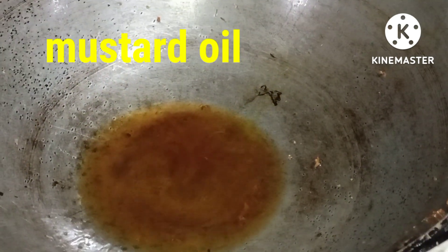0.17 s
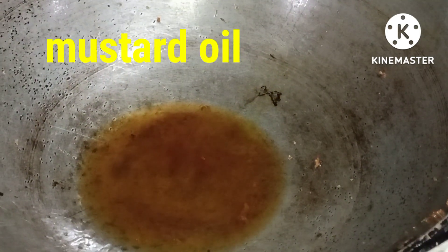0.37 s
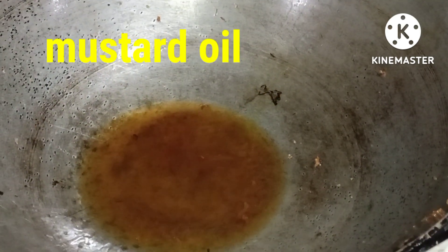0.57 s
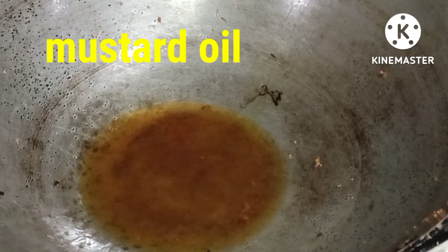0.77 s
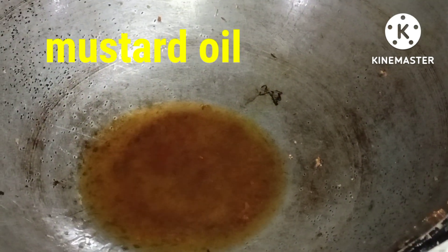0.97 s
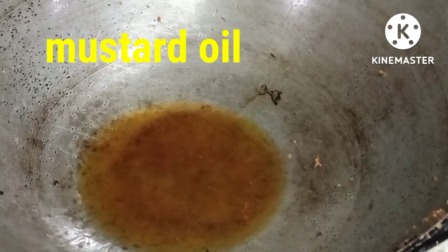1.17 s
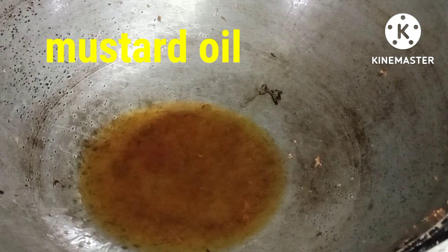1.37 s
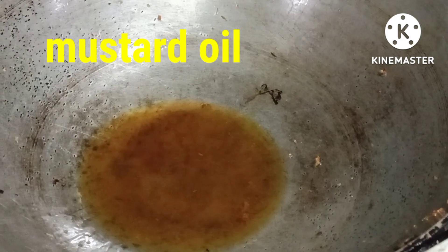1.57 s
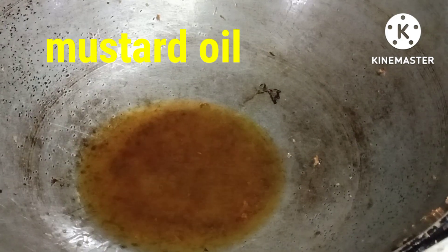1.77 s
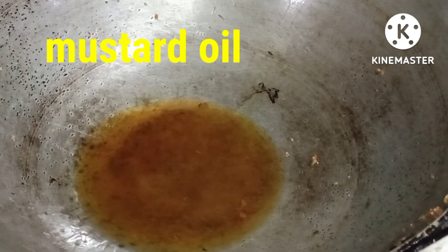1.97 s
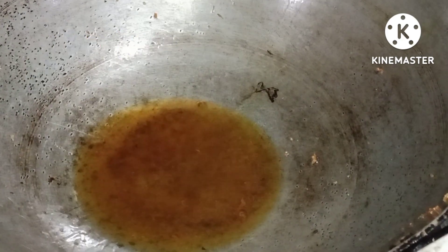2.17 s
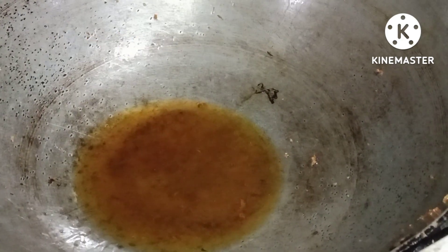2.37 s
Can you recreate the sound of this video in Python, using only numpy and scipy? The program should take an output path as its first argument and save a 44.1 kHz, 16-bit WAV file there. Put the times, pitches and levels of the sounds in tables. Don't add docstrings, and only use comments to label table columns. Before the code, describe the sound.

Hot oil pops and spits in a steel wok, each snap ringing briefly off the metal; a dense cluster comes first, then sparse pops, over faint burner hiss in a small kitchen, close microphone.

```python
import sys
import numpy as np
from scipy import signal
from scipy.io import wavfile
from scipy.ndimage import uniform_filter1d

SR = 44100
rng = np.random.default_rng(int(sys.argv[2]) if len(sys.argv) > 2 else 0)


def transcribe(signal):
    frames = np.atleast_2d(signal).T
    limited = np.clip(frames, -1, 1)
    pcm = np.round(limited * 32767).astype(np.int16)
    wavfile.write(sys.argv[1], SR, pcm)


def gain_from_db(level_db):
    decades = np.asarray(level_db, float) / 20
    return 10 ** decades


N = 105840


def columns(rows):
    return np.array(rows, float).T


def unit(x):
    return x / np.sqrt(np.mean(x ** 2))


def smooth(x, size):
    return uniform_filter1d(uniform_filter1d(x, size), size)


def reso(x, hz, width):
    return signal.lfilter(*signal.iirpeak(min(hz, 0.45 * SR), hz / width, fs=SR), x)


def reso2(x, hz, width):
    return reso(reso(x, hz, width), hz, width)


def hiss(hz, width):
    return unit(reso2(rng.standard_normal(N), hz, width))


def walk(rate):
    hold = int(SR / rate)
    levels = rng.standard_normal(N // hold + 1)
    return 4 / 3 * smooth(np.repeat(levels, hold), hold)[:N]


def add(out, x, s):
    i = int(s * SR)
    out[i:i + len(x)] += x[:max(N - i, 0)]


def ring(modes, t, gains, stretch):
    hz, db, t60 = columns(modes)[:, :, None].astype(np.float32)
    t, gains = t.astype(np.float32), gains.astype(np.float32)
    decay = gain_from_db(db - 60 * t / (t60 * stretch))
    return np.sum(gains[:, None] * decay * np.sin(2 * np.pi * hz * t), axis=0)


def swells(rows, width, roundness):
    out = np.zeros(N)
    for s, length, hz, db in rows:
        n = int(length * SR)
        noise = reso2(rng.standard_normal(SR // 2), hz, width)[-n:]
        add(out, gain_from_db(db) * np.hanning(n) ** roundness * unit(noise), s)
    return out


def glide(rows, wobble, rough_db):
    s, hz, db = columns(rows)
    t = np.arange(N) / SR
    level = np.interp(t, s, db, left=-120, right=-120) + 4.5 + rough_db * walk(50)
    pitch = np.interp(t, s, hz) * (1 + wobble * walk(65))
    return gain_from_db(level) * np.sin(2 * np.pi * np.cumsum(pitch) / SR)


# f/Hz, level/dB, t60/s
WOK_MODES = [(2470, 2, .1), (2885, -4, .17), (2990, -8, .25), (3100, -4, .2), (3385, -3, .12),
             (3445, -3, .1), (3515, -5, .16), (3650, -3, .13), (3715, -6, .1), (4000, -7, .06),
             (4370, -6, .09), (4905, -1, .15), (5140, -6, .15), (5180, -8, .12),
             (5400, -3, .12), (5515, -3, .17), (5650, -8, .18), (5795, -4, .14), (5865, -5, .18),
             (6120, -4, .15), (6420, -9, .1), (6810, -6, .15), (7260, -6, .15), (7500, -9, .12),
             (7790, -10, .12)]
# f/Hz, width/Hz, level/dB
WOK_BANDS = [(358, 550, -29), (1510, 1200, -23), (2616, 540, -3), (3240, 1000, 2.5), (4200, 500, -5.5),
             (5060, 690, 0), (5940, 780, -1.5), (7100, 1500, -3.5), (9760, 990, -13), (11990, 850, -20),
             (13400, 2700, -29), (15000, 1313, -23.5)]


def bursts(rows, sharp, modes_db, skirt_db, tail_db, top_db):
    snap_db, patchy_db, scatter_db = 33, 3.5, 3.0
    wok_modes = WOK_MODES
    out, broad, t = np.zeros(N), np.zeros(N), np.arange(SR // 5) / SR
    for s, db, hz, t60 in rows:
        noise = rng.standard_normal((3, len(t)))
        gains = gain_from_db(scatter_db * rng.standard_normal(len(wok_modes)))
        fade = gain_from_db(-60 * t / t60) + gain_from_db(tail_db - 60 * t / 0.11)
        patchy = gain_from_db(patchy_db * unit(smooth(noise[2], 150)))
        modes = ring(wok_modes, t, gains, t60 / 0.17) * np.sqrt(patchy)
        ping = noise[0] * fade * patchy + gain_from_db(modes_db) * modes
        ping[0] += gain_from_db(snap_db)
        for _ in range(3):
            ping = reso(ping, hz, hz / sharp)
        head = np.sqrt(uniform_filter1d(ping ** 2, size=60)[:900].max())
        add(out, gain_from_db(db - 4) * ping / head, s)
        snap = noise[1] * (fade + gain_from_db(2.5 - 60 * t / 0.026))
        add(broad, gain_from_db(db + skirt_db) * snap, s)
    for hz, width, db in WOK_BANDS:
        band_db = db + top_db * (hz > 9e3)
        out += gain_from_db(band_db) * reso(reso2(broad, hz, width), hz, width)
    return out


# t/s, peak level/dB, bubble f/Hz, ring t60/s
LARGE_BUBBLES = [(0.2358, -21.5, 3760, 0.18), (0.3478, -17, 3840, 0.21), (0.389, -22, 4600, 0.22),
                 (0.4399, -13, 3155, 0.13), (0.5709, -15.5, 3920, 0.14), (0.608, -18.5, 3900, 0.53),
                 (0.62, -18, 3400, 0.18), (0.6705, -7.5, 3070, 0.14), (0.7721, -28, 3450, 0.15),
                 (0.9234, -51.5, 3750, 0.17), (0.932, -46, 3840, 0.17), (1.1543, -30, 4280, 0.25),
                 (1.1628, -17.5, 3450, 0.19), (1.295, -46.5, 3700, 0.12), (1.3241, -40.5, 3550, 0.2),
                 (1.594, -21, 3670, 0.063), (1.6022, -17, 3695, 0.18), (2.0185, -37, 2230, 0.08),
                 (2.1306, -41.5, 3480, 0.14), (2.3039, -37, 4030, 0.19)]


def large_bubbles():
    return bursts(LARGE_BUBBLES, 4.6, modes_db=-7.0, skirt_db=-12, tail_db=-35.0, top_db=-11.5)


# t/s, peak level/dB, bubble f/Hz, ring t60/s
SMALL_BUBBLES = [(0.2368, -32, 5570, 0.097), (0.3082, -14, 5300, 0.23), (0.3264, -21, 6770, 0.27),
                 (0.3427, -43, 5050, 0.14), (0.3475, -21, 5070, 0.052), (0.3902, -22.5, 5680, 0.2),
                 (0.4374, -17.5, 5360, 0.14), (0.4929, -10, 5820, 0.18), (0.5104, -9.5, 5560, 0.067),
                 (0.5708, -22, 5170, 0.088), (0.6084, -24.5, 4920, 0.19), (0.623, -14, 4630, 0.15),
                 (0.671, -7.5, 5940, 0.12), (0.7705, -26, 5030, 0.17), (0.9326, -41, 7150, 0.12),
                 (1.1522, -30, 4285, 0.15), (1.1621, -22.5, 5020, 0.12), (1.28, -53.5, 6970, 0.1),
                 (1.4202, -26.5, 5710, 0.11), (1.5933, -35, 6040, 0.11), (2.1328, -11, 5594, 0.15),
                 (2.2434, -32.5, 7370, 0.25), (2.2507, -33, 6500, 0.12), (2.3027, -33, 5900, 0.092)]


def small_bubbles():
    return bursts(SMALL_BUBBLES, 5.3, modes_db=-10.0, skirt_db=-23.0, tail_db=-17, top_db=5.0)


# t/s, peak level/dB, f/Hz, ring t60/s
CLEAN_PINGS = [(.2358, -34, 7000, 0.16), (.2358, -34.5, 2615, 0.086), (.31, -38.5, 2650, .1),
               (.44, -26.5, 2510, 0.1), (.62, -29, 2480, 0.064), (.672, -25, 2430, 0.2),
               (.672, -40.5, 7100, 0.27), (1.4202, -41, 7000, 0.11), (1.594, -28.5, 4610, 0.16),
               (1.6022, -23.5, 4786, 0.13), (1.594, -33, 7380, 0.19), (1.6022, -39, 2460, 0.23),
               (2.0185, -23, 3238, 0.21), (2.0185, -26.5, 3032, 0.17), (2.0185, -37, 5000, 0.063),
               (2.0185, -31.5, 6260, 0.13), (1.163, -34.5, 2453, 0.14), (1.163, -30.5, 6570, 0.18),
               (.933, -58, 2500, 0.11), (2.133, -29, 7360, 0.15), (2.133, -23.5, 5250, 0.18),
               (2.3035, -50, 2576, 0.24)]


def clean_pings():
    return bursts(CLEAN_PINGS, 8, modes_db=-4.5, skirt_db=-25.5, tail_db=-24.5, top_db=5.5)


# t/s, peak level/dB, f/Hz, ring t60/s
SPITS = [(0.3475, -48, 14200, 0.08), (0.363, -31.5, 15000, 0.1), (0.4394, -36, 9500, 0.35),
         (0.4933, -50, 11500, 0.12), (0.519, -43, 15000, 0.13), (0.584, -36, 9780, 0.43),
         (0.6712, -42, 9800, 0.072), (0.7298, -44, 12000, 0.11), (0.787, -23.5, 16350, 0.15),
         (1.4187, -50.5, 9950, 0.094), (1.695, -62, 12100, 0.062), (2.045, -48.5, 9500, 0.12),
         (2.1324, -43, 10760, 0.079)]


def spits():
    return bursts(SPITS, 10, modes_db=-41, skirt_db=-8, tail_db=-39.5, top_db=-3)


# start t/s, length/s, f/Hz, level/dB
FIZZ = [
    (.3, .27, 12100, -62.5),
    (.43, 0.063, 13040, -50.5),
]


def fizz():
    return swells(FIZZ, 4100, 0.56)


# t/s, peak level/dB
TICKS = [(.09, -65), (.125, -51), (0.419, -43), (.428, -41.5), (.788, -51), (0.2352, -33), (1.163, -60),
         (1.42, -49.5), (1.594, -60.5), (2.135, -43), (2.2447, -28.5), (2.253, -34)]


def ticks():
    out, t = np.zeros(N), np.arange(SR // 8) / SR
    for s, db in TICKS:
        fade = gain_from_db(-60 * t / 0.0027) + gain_from_db(-18.0 - 60 * t / 0.1)
        add(out, gain_from_db(db) * rng.standard_normal(len(t)) * fade, s)
    return signal.sosfilt(signal.butter(4, 5000, "high", fs=SR, output="sos"), out)


# f/Hz, level/dB, t60/s
KNOCK_MODES = [(267, -20, 0.056), (338.4, -21.5, 0.15), (413.2, 6.5, 0.076), (562, -25, 0.053),
               (820.3, 11.5, 0.1)]


def knock():
    knock_s, knock_db, push_s = 0.4295, -18, 0.0069
    t = np.arange(SR // 4) / SR
    body = ring(KNOCK_MODES, t, np.ones(len(KNOCK_MODES)), 0.75)
    rough = unit(reso(reso(rng.standard_normal(len(t)), 260, 420), 210, 680))
    x = body / np.abs(body).max() + gain_from_db(-16.5 - 60 * t / 0.16) * rough
    out = np.zeros(N)
    add(out, gain_from_db(knock_db) * x * (1 - np.exp(-t / push_s)), knock_s)
    return out


# f/Hz, width/Hz, level/dB
BURNER = [
    (8270, 410, -65.5),
    (9220, 19, -75.5),
    (7000, 280, -80.5),
    (9800, 4500, -78),
]


def burner():
    return sum(gain_from_db(db + 2.12 * walk(2)) * hiss(hz, width) for hz, width, db in BURNER)


# start t/s, length/s, f/Hz, level/dB
THUDS = [(.12, 0.11, 62.6, -71.5), (.23, 0.18, 66.3, -60), (.44, 0.21, 63.3, -57.5),
         (.76, 0.11, 60.8, -58.5), (.92, 0.12, 67.6, -67), (1.13, .1, 100.7, -62.5), (1.62, 0.23, 63, -67),
         (1.9, 0.3, 108.3, -55.5), (2.0, 0.12, 213, -64.5), (2.12, 0.19, 67, -61),
         (2.33, 0.087, 82.5, -62.5)]


def thuds():
    return swells(THUDS, 50, 0.7)


# f/Hz, level/dB per Hz
ROOM_TONE = [(18, -35), (30, 10), (111, 7.5), (1130, -7), (1280, -1), (1900, -10), (4520, -15.5),
             (8380, -3.5), (11000, -17.5), (14300, -63), (22000, -120)]


def room_tone():
    f, level = columns(ROOM_TONE)
    room = np.zeros(N)
    for hz in 50 * 2 ** np.arange(0, 7.9, 1 / 3):
        band_db = np.interp(np.log(hz), np.log(f), level) + 10 * np.log10(hz)
        room += gain_from_db(band_db + 2.6 * walk(13.96)) * hiss(hz, hz / 3.8)
    return gain_from_db(-70.5) * unit(room)


def stove_and_room():
    dull = signal.ellip(8, 1, 40, 10580, fs=SR, output="sos")
    floor = signal.sosfilt(dull, burner() + room_tone())
    return floor + thuds() + gain_from_db(-92) * hiss(15200, 900) + gain_from_db(-95) * hiss(13000, 3000)


# start t/s, length/s, f/Hz, level/dB
CHIRPS = [(0.098, 0.01, 760, -78), (0.636, 0.061, 590, -62), (0.69, 0.092, 580, -64.5),
          (1.03, 0.059, 1250, -71), (1.27, 0.073, 1280, -69), (1.41, 0.091, 1660, -70),
          (1.15, .06, 1356, -68.5), (0.203, 0.043, 4000, -64), (2, 0.057, 1400, -76),
          (1.783, 0.066, 1324, -66.5), (1.937, 0.03, 1330, -67.5), (2.039, 0.064, 1408, -60),
          (2.154, 0.066, 1240, -61), (1.85, 0.12, 5700, -71.5), (1.1, 0.11, 6750, -66),
          (1.8, 0.065, 6750, -60), (1.7, 0.12, 4000, -81), (.38, 0.055, 2050, -58),
          (.5, 0.043, 1200, -66.5), (2.32, 0.085, 6600, -64), (0.115, 0.04, 5280, -64.5)]
# t/s, f/Hz, level/dB
WHINE = [(0, 1250, -70.5), (.1, 1282, -70), (.2, 1377, -77), (.28, 1415, -70.5), (.36, 1540, -94)]
# t/s, f/Hz, level/dB
WHISTLE = [(1.722, 3040, -80), (1.736, 3000, -61), (1.756, 2930, -58), (1.78, 2970, -57),
           (1.812, 2930, -68), (1.83, 2950, -75), (1.87, 2950, -90)]
# t/s, f/Hz, level/dB
WAVER = [(.61, 1280, -85), (.645, 1270, -69), (.68, 1200, -64), (.72, 1180, -69), (.76, 1190, -71),
         (.8, 1240, -67), (.84, 1150, -80)]


def outside():
    tones = glide(WHINE, 0.02, 4) + glide(WHISTLE, 0.008, 2.5) + glide(WAVER, 0.03, 4)
    return tones + swells(CHIRPS, 130, 0.7)


def scene():
    oil = large_bubbles() + small_bubbles() + clean_pings() + spits() + fizz() + ticks()
    return (oil + knock() + stove_and_room() + outside())[None]


def low_pass(x):
    return signal.sosfilt(signal.butter(12, 16810, fs=SR, output="sos"), x)


def record(dry):
    top_cut = signal.ellip(6, 0.2, 30, 15600, fs=SR, output="sos")
    mix = signal.sosfilt(top_cut, dry)
    return low_pass(mix)


dry = scene()
out = record(dry)
transcribe(out)
```